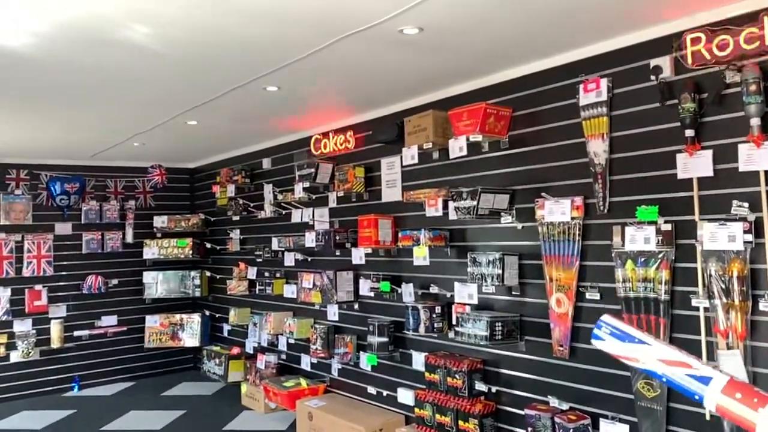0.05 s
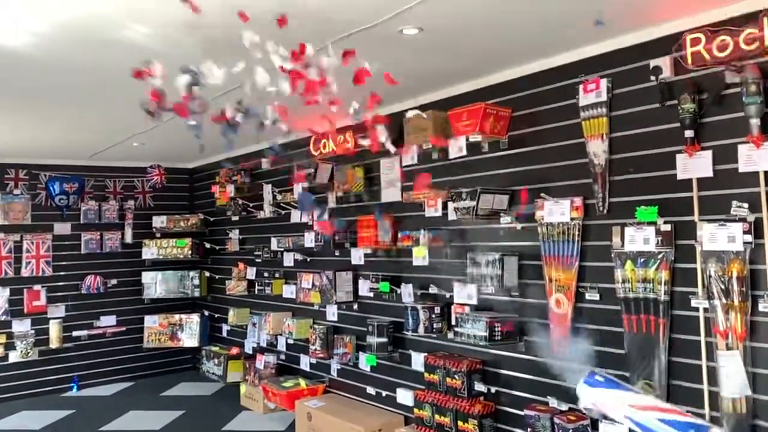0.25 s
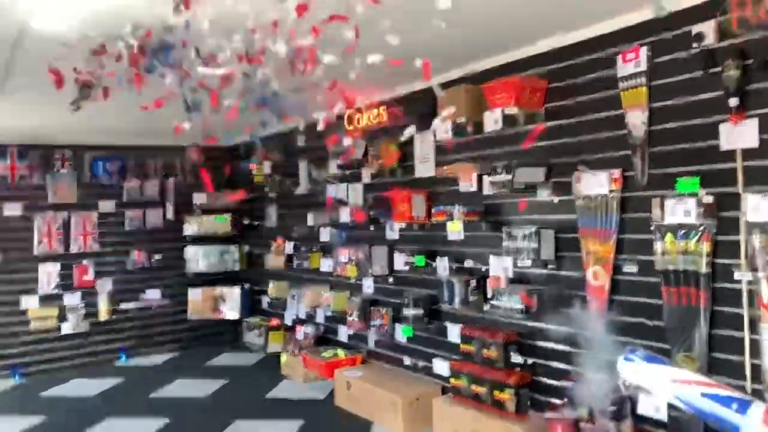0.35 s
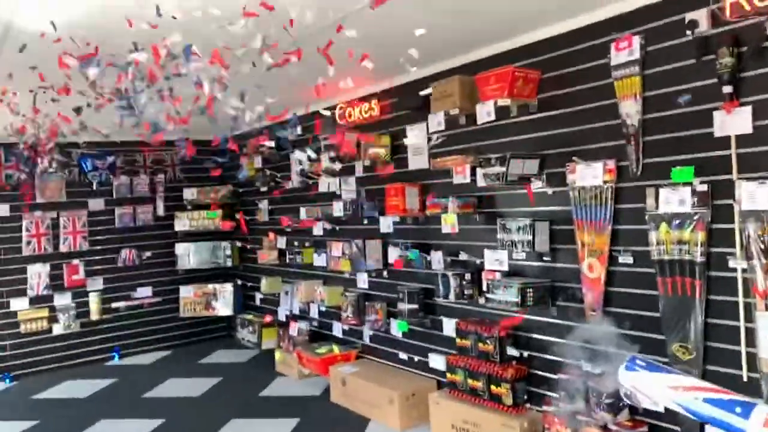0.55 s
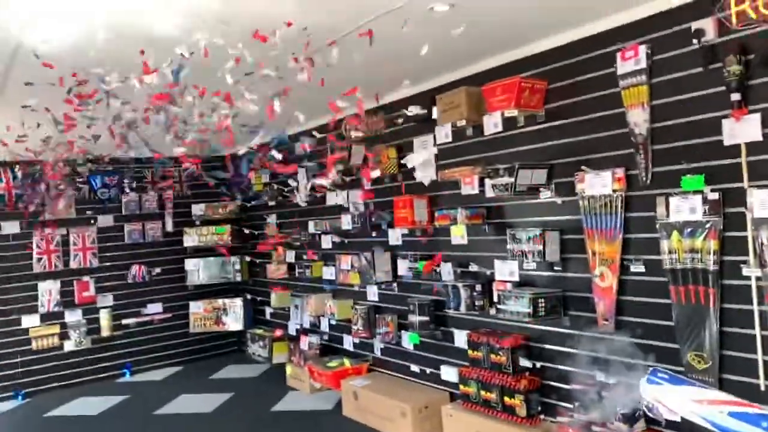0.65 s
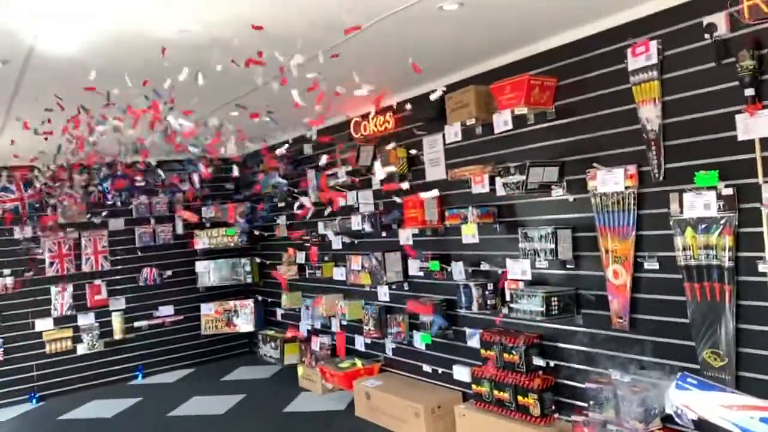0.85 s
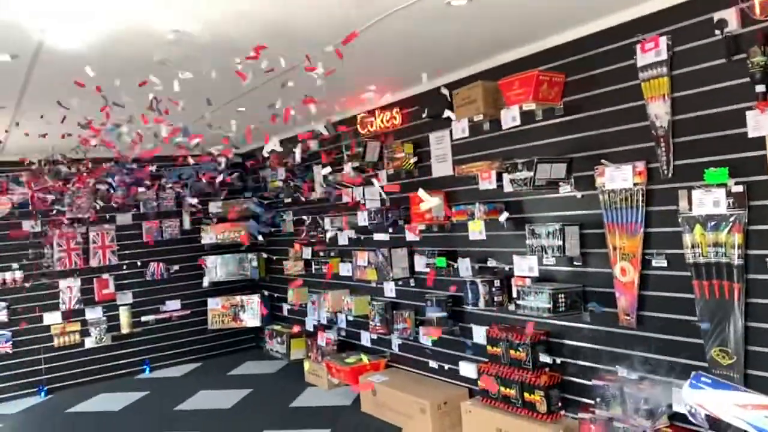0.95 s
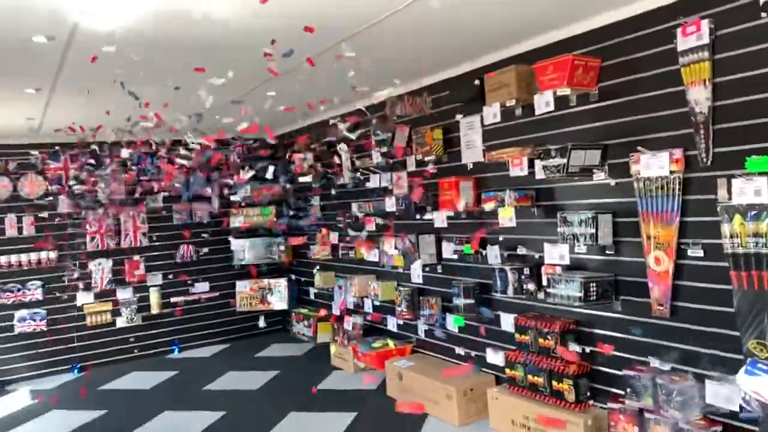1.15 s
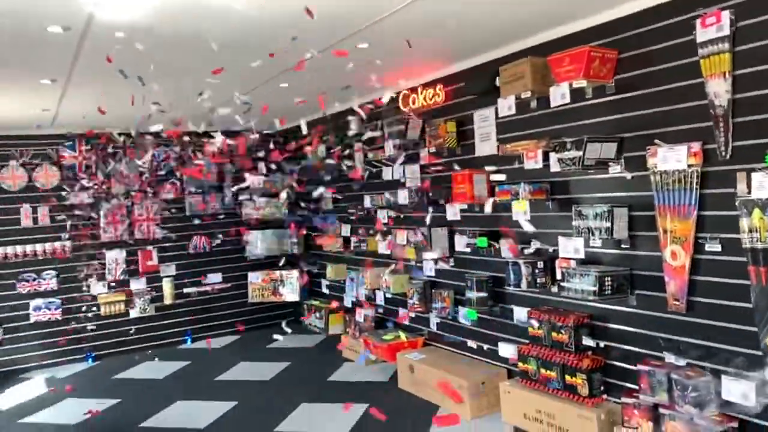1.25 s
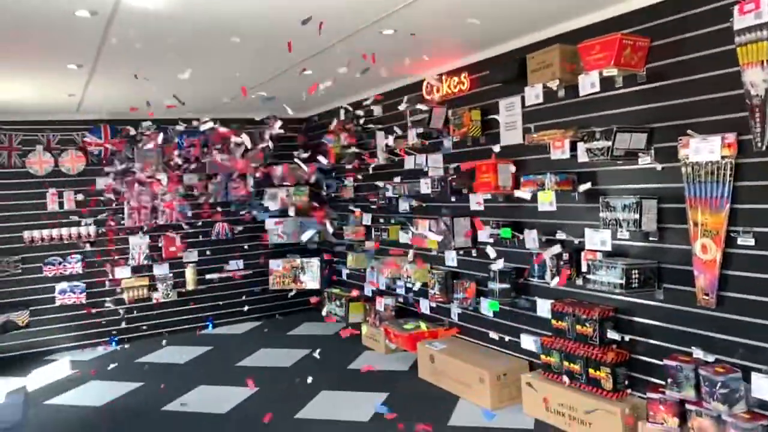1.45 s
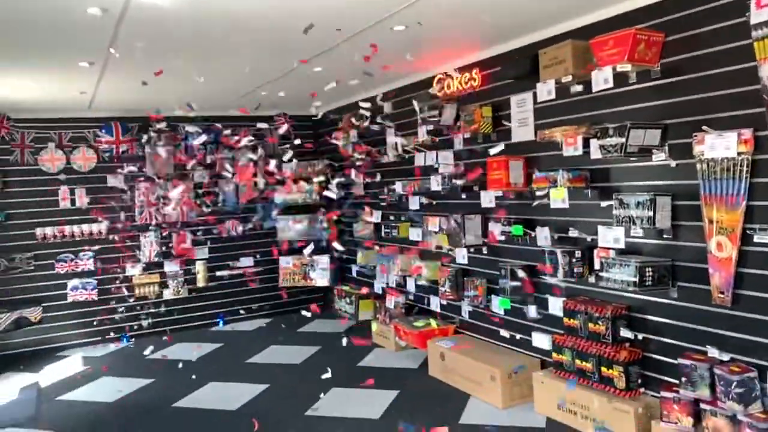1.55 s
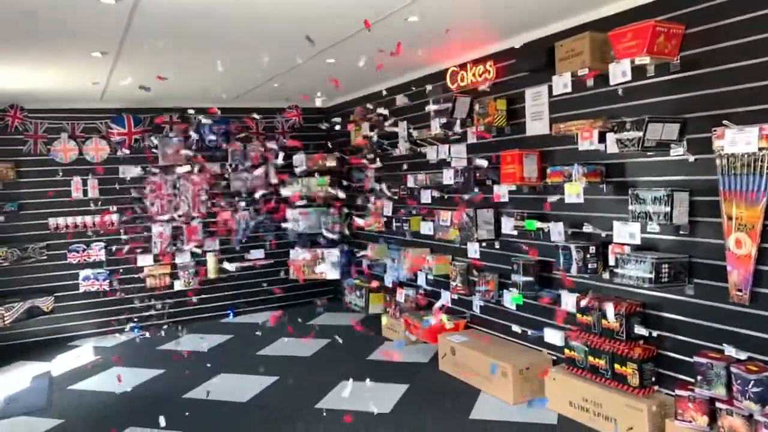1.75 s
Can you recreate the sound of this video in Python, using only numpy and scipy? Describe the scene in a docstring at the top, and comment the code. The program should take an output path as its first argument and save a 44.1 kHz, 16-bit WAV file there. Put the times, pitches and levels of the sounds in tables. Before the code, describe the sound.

A confetti cannon pops sharply in a small shop, with a short rush of air.

```python
"""A brief hiss, a crack and a pop: a compressed-air confetti cannon goes off in a small shop,
just right of the microphone. The seal cracks, the charge leaves the tube and sets it ringing,
and air rushes out for a third of a second. Something from the charge smacks a far surface;
then paper flutters down among a few faint taps, over low room rumble and handling noise."""
import sys
import numpy as np
from scipy import signal
from scipy.fft import rfft, irfft
from scipy.io import wavfile
from scipy.ndimage import uniform_filter1d

SR = 44100
rng = np.random.default_rng(int(sys.argv[2]) if len(sys.argv) > 2 else 0)


def unload_audio(sound):
    """Save the sound as a 16-bit wav file, at the path given as the first command line argument."""
    columns = np.transpose(np.atleast_2d(sound))
    # keep every value between -1 and 1, then stretch to whole-number steps
    steps = np.round(np.clip(columns, -1, 1) * 32767)
    wavfile.write(sys.argv[1], SR, steps.astype(np.int16))


N = 79380
T, HZ = np.arange(N) / SR, np.fft.rfftfreq(N, 1 / SR)
CRACK_S, POP_S = .2335, .2442

# Left-right likeness of diffuse sound at the microphone: frequency_hz, coherence
DIFFUSE = [(60, .9), (130, 1), (290, 0.6), (640, .4), (1400, .05), (15000, .03)]


def amp(db):
    """Decibels to gain."""
    return 10 ** (np.asarray(db) / 20)


def unit(x):
    """Scales to rms 1."""
    return x / np.sqrt(np.mean(x ** 2) + 1e-20)


def at_hz(points, hz):
    """Reads a table on a log-frequency axis."""
    f, value = np.transpose(points)
    return np.interp(np.log(hz + 1), np.log(f + 1), value)


def fader(points):
    """Gain over time from rows of time_s, level_db."""
    return amp(np.interp(T, *np.transpose(points)))


def pan(right_db):
    """Channel gains with the right side louder by right_db."""
    return unit(amp([[-right_db / 2], [right_db / 2]]))


def colour(x, spectrum, coherence=DIFFUSE):
    """Makes two unrelated signals partly alike and filters them, at rms 1."""
    left, other = rfft(x)
    alike = np.clip(at_hz(coherence, HZ), -1, 1)
    right = alike * left + np.sqrt(1 - alike ** 2) * other
    return unit(irfft(np.array([left, right]) * amp(at_hz(spectrum, HZ)), N))


def noise(spectrum, coherence=DIFFUSE):
    """Stereo noise coloured by rows of frequency_hz, relative_db."""
    return colour(rng.standard_normal((2, N)), spectrum, coherence)


def burst(start, spectrum, attack, hold, t60, db, coherence=DIFFUSE):
    """A puff of noise that rises, holds and dies away."""
    t = T - start
    envelope = np.clip(t / attack, 0, 1) * amp(-60 * np.maximum(t - attack - hold, 0) / t60)
    return amp(db) * unit(noise(spectrum, coherence) * envelope) * np.sqrt(np.mean(envelope ** 2))


def ring(start, modes, rise_s):
    """Resonances that build up, then decay."""
    t = np.maximum(T - start, 0)
    decay_s = np.maximum(t - rise_s, 0)
    tones = sum(amp(db - 60 * decay_s / t60) * np.sin(2 * np.pi * hz * t) for hz, db, t60 in modes)
    return np.minimum(t / rise_s, 1) ** 2 * tones


def shop(x, wet_db, paths=2):
    """Adds the shop's diffuse tail over echo paths, each band dying at its own speed."""
    # Reverberation time: frequency_hz, t60_s
    decay = [(60, .5), (250, .52), (800, .43), (2500, 0.36), (5000, .35), (10000, 0.37), (16000, .27)]
    gap_s, scatter_hz = .008, 25
    feed = (x * np.ones((2, 1))).sum(0) / np.sqrt(2)
    wet = 0
    for k in range(paths):
        hz, t, bands = signal.stft(noise([(20, 0), (20000, 0)]), SR, nperseg=256)
        bands = bands * amp(-60 * t / at_hz(decay, hz)[:, None])
        tail = signal.istft(bands, SR, nperseg=256)[1][:, :N] * np.clip(T / gap_s - .5, 0, 1)
        tail = tail[:, :SR] / np.linalg.norm(tail[0])
        # The first path is fed steadily; the feed to the next one swings.
        share = unit(np.cos(2 * np.pi * k * scatter_hz * T)) / np.sqrt(paths)
        wet = wet + signal.fftconvolve((feed * share)[None], tail, axes=1)[:, :N]
    return x + amp(wet_db) * wet


def room_tone():
    """The shop's low rumble, its level wavering slightly."""
    # Rumble colour: frequency_hz, relative_db
    spectrum = [(10, -40), (28, -20), (50, 0), (72, 2), (110, -10), (250, -21), (500, -29), (1500, -36),
                (4000, -45), (15000, -46)]
    swell = unit(uniform_filter1d(uniform_filter1d(rng.standard_normal(N), 3000), 2000))
    return noise(spectrum) * amp(-65 + 1.1 * swell)


def handling():
    """Rumble of the hand-held microphone, with dull knocks and scuffs."""
    # Rumble at the microphone: time_s, level_db
    rumble_level = [(0, -51), (.2, -53), (.6, -57), (.8, -64), (1, -78), (1.3, -58), (1.5, -66),
                    (1.68, -73), (1.78, -57)]
    # Knocks and scuffs: start_s, level_db, t60_s, centre_hz
    bumps = [(0, -60, 0.62, 900), (0.011, -65, 0.13, 1800), (1.079, -74, .1, 900), (1.215, -69, .08, 1900),
             (1.255, -66, 0.097, 250), (1.39, -71, .15, 1100), (1.553, -65, 0.12, 500),
             (1.565, -65, 0.058, 1200)]
    knocks = 0
    for start, db, t60, hz in bumps:
        spectrum = [(hz / 8, -14), (hz / 2, -4), (hz, 0), (hz * 2, -13), (hz * 8, -42)]
        knocks += burst(start, spectrum, .006, .008, t60, db)
    rumble = noise([(10, -35), (25, -8), (55, 0), (100, -13), (250, -28.5), (1000, -54), (4000, -70)])
    return rumble * fader(rumble_level) + shop(knocks, wet_db=-3.5)


def confetti():
    """Many tiny paper clicks merge into a rustle, with a few separate ticks."""
    # Paper colour: frequency_hz, relative_db
    paper = [(300, -12), (1000, -3), (2000, -1), (4000, 0.5), (6500, -3), (9000, 1), (14000, -.5),
             (16000, -7)]
    # Rustle: time_s, level_db
    rustle_level = [(.1, -88), (.6, -64), (.88, -67), (1.02, -75), (1.18, -74.5), (1.27, -69), (1.34, -74),
                    (1.6, -74.5), (1.8, -80)]
    # Faint ticks, one before the shot, the rest as paper lands: start_s, level_db, t60_s
    tick_times = [(.076, -67, 0.035), (.89, -60, .05), (1.119, -67, 0.036), (1.216, -60, .05),
                  (1.255, -64, .1)]
    flakes_per_s, spread_db = 2500, 3
    size = amp(spread_db * np.minimum(rng.exponential(1, (2, N)), 4))
    flakes = size * rng.standard_normal((2, N)) * (rng.random((2, N)) < flakes_per_s / SR)
    ticks = sum(burst(start, paper, .001, .002, t60, db) for start, db, t60 in tick_times)
    return colour(flakes, paper) * fader(rustle_level) + ticks


def clink(start_s=1.06):
    """One light contact: a tick and a short, high ring."""
    # Ring: pitch_hz, level_db, t60_s
    modes = [(2050, -68, .05), (3900, -65, .16), (4298, -70, .03)]
    # Contact noise: frequency_hz, relative_db
    tick = [(1000, -25), (2000, 0), (2700, -7), (4200, 1), (5500, -12), (14000, -16)]
    return ring(start_s, modes, rise_s=.004) + burst(start_s, tick, .004, .004, t60=.06, db=-64)


def far_smack(start_s=.6355):
    """Part of the charge slaps a surface across the shop, with a thud and hum under it."""
    # Colours of the impact: frequency_hz, relative_db
    slap_colour = [(100, -12), (250, -2), (450, -.5), (800, 1.5), (2000, -1.5), (3000, -6.5), (4400, -4),
                   (6500, -11), (9500, -8), (14000, -9), (16000, -19)]
    snap_colour = [(1000, -20), (3200, -12), (4000, -1), (4700, 0), (5800, -14), (9000, -12), (14000, -11),
                   (16000, -18)]
    thud_colour = [(30, -15), (85, 3), (140, -5), (240, -4), (420, -6), (1000, -22), (4000, -44)]
    # Their envelopes: attack_s, hold_s, t60_s, level_db
    slap_shape = (.005, .007, .06, -30.7)
    snap_shape = (.001, .004, .02, -30)
    thud_shape = (.012, .014, 0.1224, -38)
    # Resonances set off by the smack: pitch_hz, level_db, t60_s
    hum_modes = [(224, -45, .5), (378, -50, .45)]
    slap = shop(burst(start_s, slap_colour, *slap_shape), wet_db=-2)
    snap = shop(burst(start_s + .003, snap_colour, *snap_shape), wet_db=-5)
    thud = shop(burst(start_s, thud_colour, *thud_shape), wet_db=-4.5, paths=1)
    hum = ring(start_s, hum_modes, rise_s=.05)
    return slap + snap + (thud + hum) * pan(right_db=3)


def escaping_air():
    """A hiss swells just before the shot; the cylinder then empties in a turbulent jet."""
    # Colours of the air: frequency_hz, relative_db
    hiss_colour = [(100, -10), (700, 0), (2000, -1), (4500, -2.5), (9000, -5), (16000, -10.5)]
    jet_colour = [(24, -28), (45, -5), (104, -17), (231, -7), (433, -7.5), (1000, -8.5), (2260, -14.5),
                  (5000, -23.5), (9940, -31), (14500, -32), (16000, -48)]
    # Strength of each flow: time_s, level_db
    hiss_level = [(.1, -84), (.15, -66), (.205, -52), (.218, -43), (.232, -38), (.245, -50)]
    jet_level = [(.24, -55), (.27, -30), (.33, -31.5), (.39, -35.5), (.48, -36.5), (.56, -39), (.61, -47),
                 (.7, -64), (.8, -88)]
    hiss = noise(hiss_colour) * fader(hiss_level) * (T < POP_S)
    jet = noise(jet_colour) * fader(jet_level) * (T > CRACK_S)
    return hiss * pan(right_db=3) + jet * pan(right_db=1.5)


def air_push(centre_s=.263, pitch_hz=48, width_s=.014):
    """The charge shoves the air aside in one low pressure swing."""
    t = T - centre_s
    return -amp(-24) * np.sin(2 * np.pi * pitch_hz * t) * np.exp(-(t / width_s) ** 2)


def cannon():
    """Right of the microphone the seal cracks; the charge pops out and rings the tube."""
    # Colours of the seal's crack, the pop and its low body: frequency_hz, relative_db
    crack_colour = [(100, -30), (500, -12), (1050, 0), (1500, -2), (1950, -1), (2600, -5), (4200, -5),
                    (7500, -14), (9000, -40), (16000, -45)]
    pop_colour = [(100, -15), (600, -1), (1900, -1), (2600, -3), (4300, -4), (5300, -11), (8500, -8),
                  (13500, -7.5), (16000, -13)]
    body_colour = [(30, -16), (90, -19), (130, -21), (220, -7), (450, 1), (750, .5), (1050, 0), (1700, -14),
                   (5000, -40)]
    # Their envelopes: attack_s, hold_s, t60_s, level_db
    crack_shape = (.005, 0.0045, .022, -11.5)
    pop_shape = (0, 0.0081, 0.0551, -16.5)
    body_shape = (0.0036, .007, .027, -13.3)
    # Left-right likeness of sound straight from the muzzle: frequency_hz, coherence
    direct = [(100, 0.96), (600, .8), (1500, 0.6), (5000, .4), (9000, .9), (15000, 0.94)]
    # The tube's ring and the low resonances that hum on: pitch_hz, level_db, t60_s
    tube_modes = [(238, -14.5, .05), (360, -18, .05), (540, -23, .07), (638, -24, .08), (1250, -29, .12),
                  (1880, -24, .13), (3562, -28, .11)]
    hum_modes = [(53, -37, 1.4), (154, -41, .95), (231, -36.5, 1.0), (363, -45, .85)]
    crack = burst(CRACK_S, crack_colour, *crack_shape) * pan(right_db=11)
    pop = burst(POP_S, pop_colour, *pop_shape, direct) * pan(right_db=1)
    body = burst(POP_S + .002, body_colour, *body_shape, direct) * pan(right_db=2)
    tube = ring(.2425, tube_modes, rise_s=.009) * pan(right_db=1.5)
    hum = ring(POP_S, hum_modes, rise_s=.05) * pan(right_db=2.5)
    return shop(crack + pop + body, wet_db=-7) + shop(tube, wet_db=-17, paths=1) + hum


def scene():
    """The shot and its aftermath over the sound of the shop."""
    shot = cannon() + air_push() + escaping_air()
    small_sounds = shop(confetti() + clink(), wet_db=-1)
    return shot + far_smack() + small_sounds + room_tone() + handling()


def record(dry):
    """Rounds off the peaks, then cuts the highest treble."""
    ceiling, cutoff_hz = .9, 16100
    clipped = dry / (1 + (abs(dry) / ceiling) ** 6) ** (1 / 6)
    lowpass = signal.firwin(511, cutoff_hz, window=("kaiser", 9), fs=SR)
    return signal.oaconvolve(clipped, lowpass[None], "same")


dry = scene()
out = record(dry)
unload_audio(out)
```